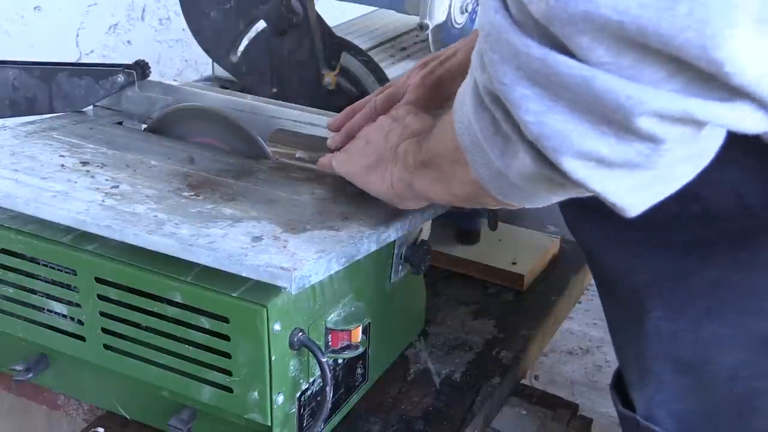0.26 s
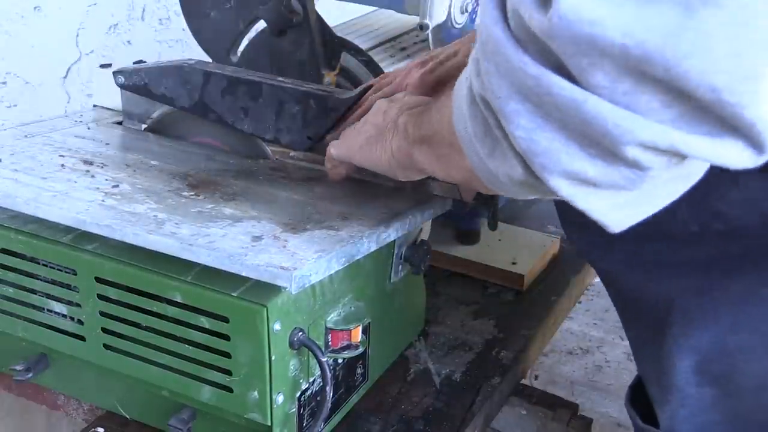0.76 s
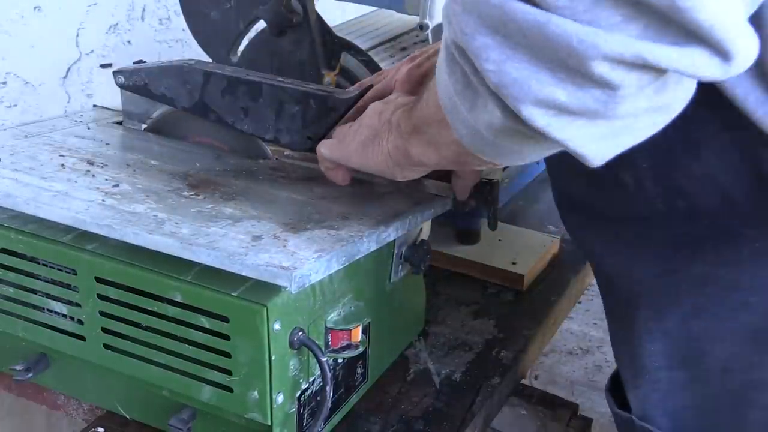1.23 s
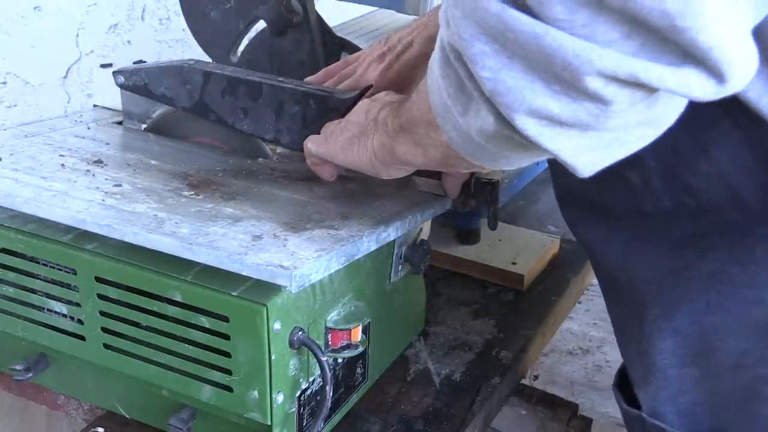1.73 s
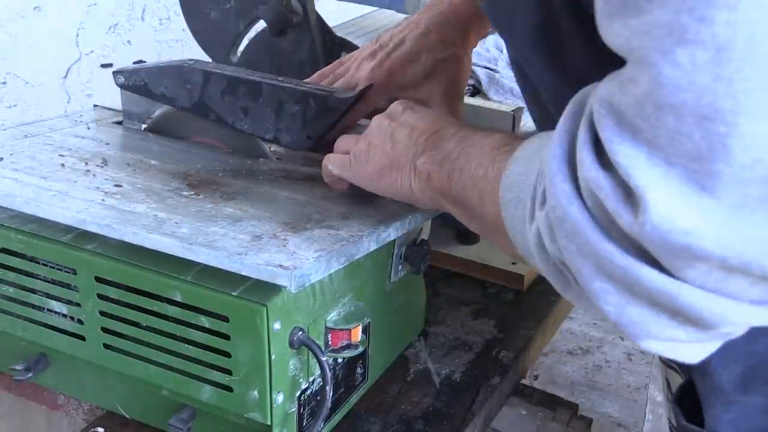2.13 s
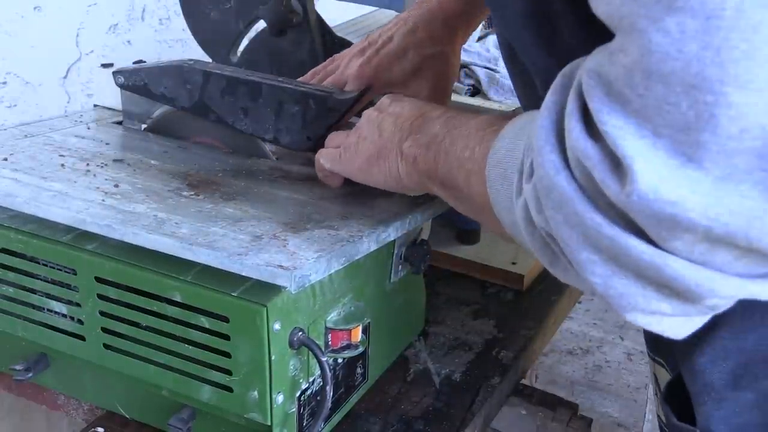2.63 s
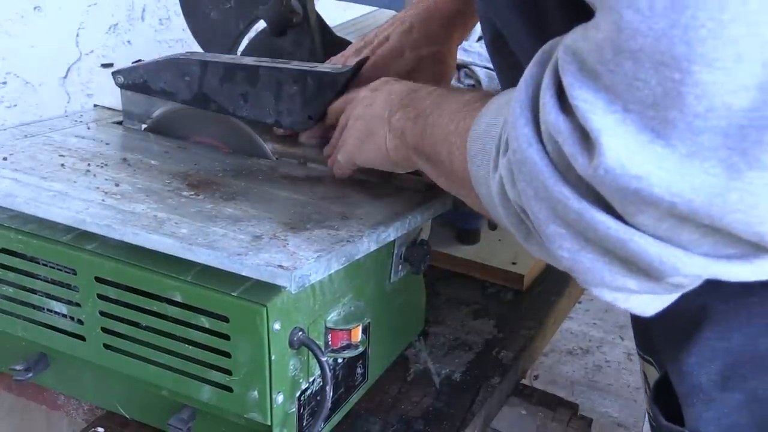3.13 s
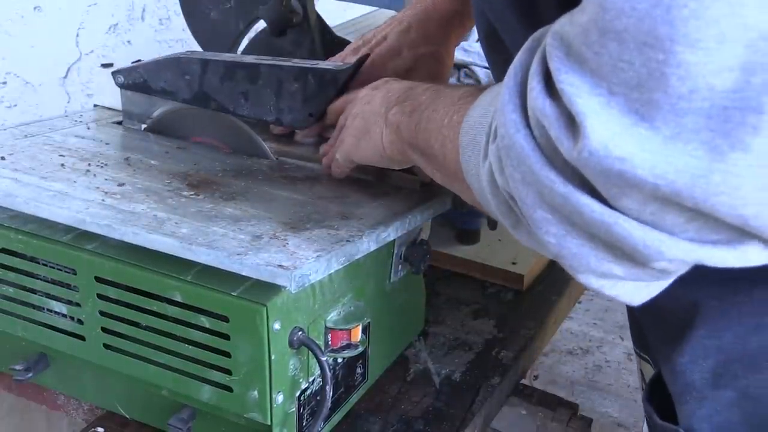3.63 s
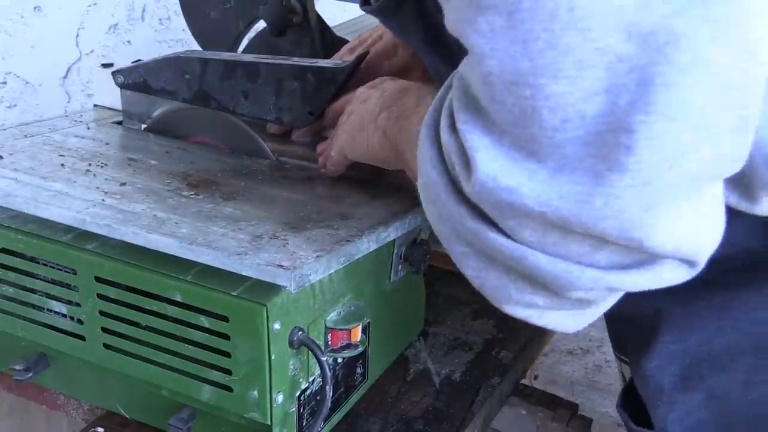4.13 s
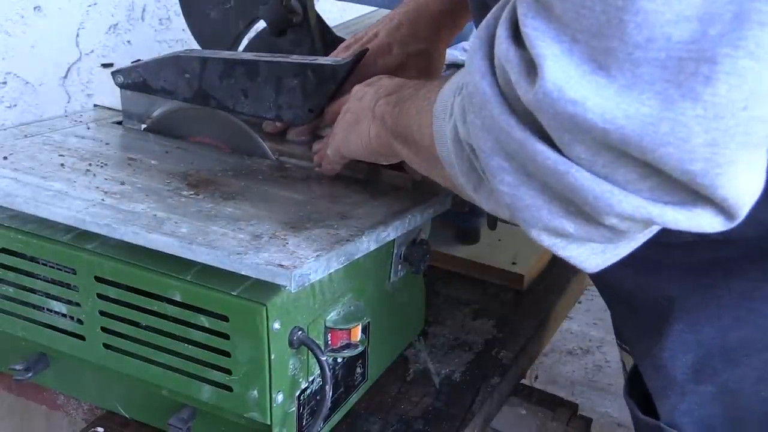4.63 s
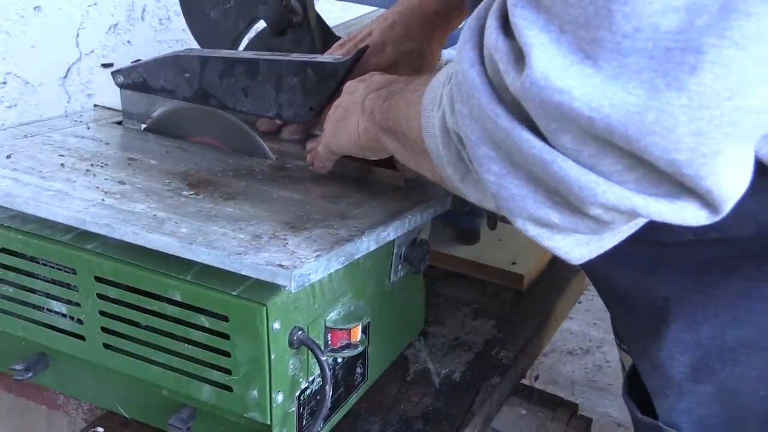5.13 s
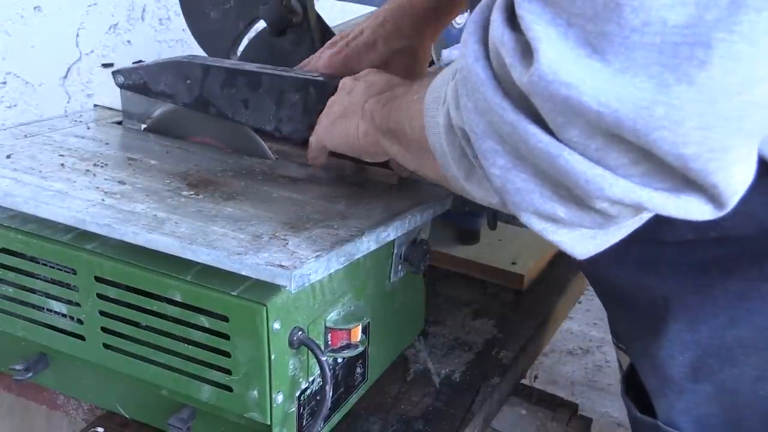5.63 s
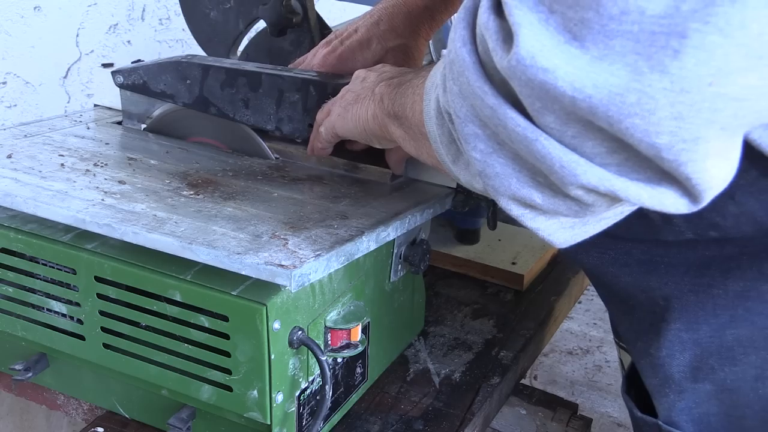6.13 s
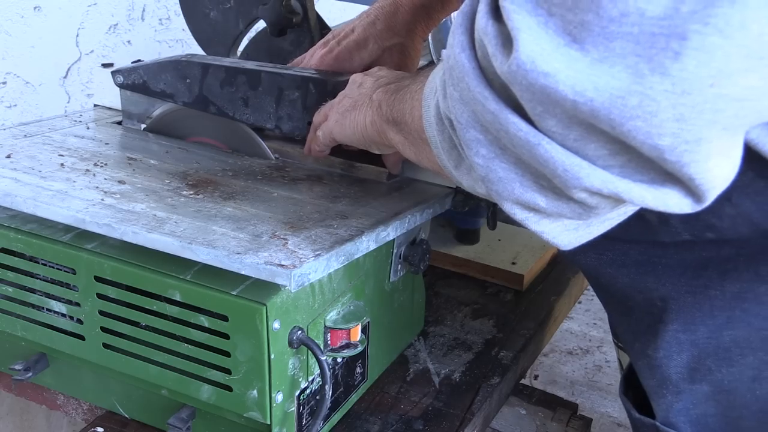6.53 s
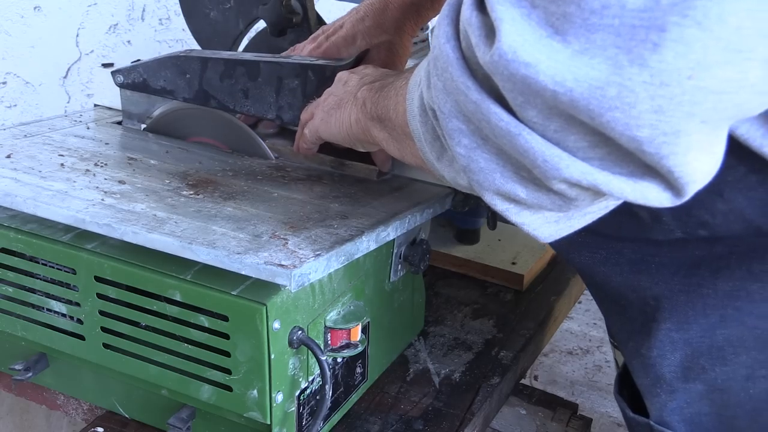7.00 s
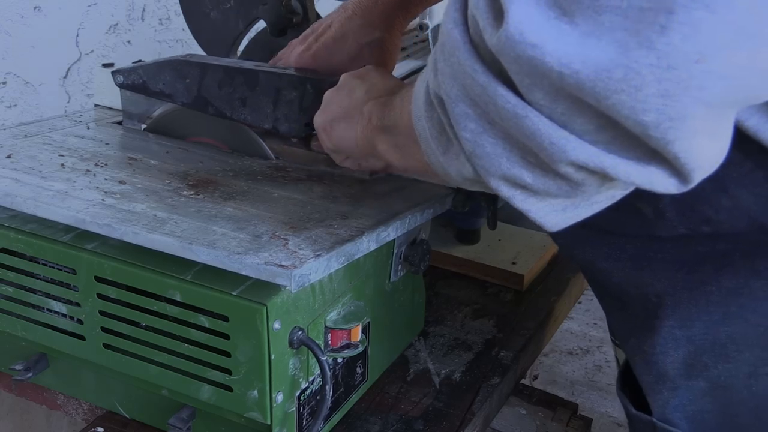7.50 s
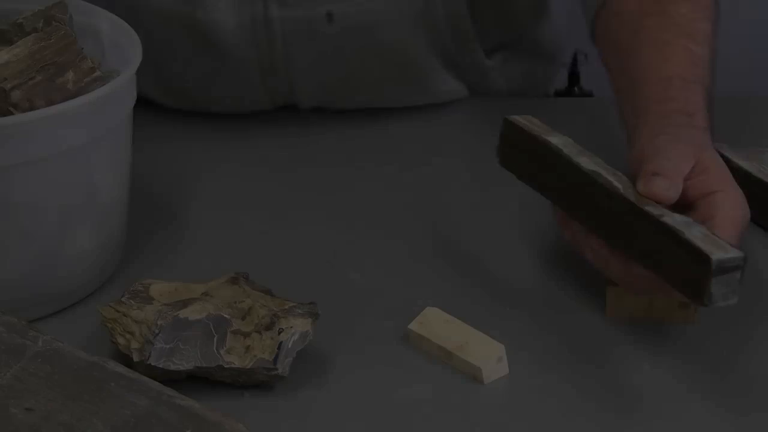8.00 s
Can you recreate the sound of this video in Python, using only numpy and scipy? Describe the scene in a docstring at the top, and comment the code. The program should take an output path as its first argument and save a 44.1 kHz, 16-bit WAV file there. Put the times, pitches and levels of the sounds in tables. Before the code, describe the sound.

From 0 seconds a small wet tile saw is already cutting stone, close and centred, with a shrill, many-toned metallic whine over a dense gritty hiss and bright water fizz. First contact rings clear and squealy; around 0.6 seconds a flake breaks with a tiny bright snap, nearly buried. Between about 0.7 and 2.6 seconds repeated pushes make the pitch sag slightly and the timbre shift, with brief squeals, strongest near 2.3 and 2.6. From 2.7 to 5 seconds the blade sits deep and the whine is steadier, with a slight tremble. Smaller dips return from 5 to 7.5 seconds, and high ringing grows brighter toward the end. At about 7.9 seconds the saw noise is cut instantly. Only a very faint, low room rumble remains, with a soft bump just after the cut and another near 8.1 seconds.

```python
"""In a workshop, a small wet tile saw grinds through a slab of stone, heard from a fixed spot beside it.
The blade rubs the stone about 353 times a second. This makes a stack of sine overtones that sags under load
and swells near the rings of the steel disc. Filtered noise makes the grit's hiss, the water's fizz and a
breaking flake. The saw stops at once, leaving a quiet room of low filtered noise with a few soft bumps."""
import sys
import numpy as np
from scipy import signal
from scipy.fft import rfft, irfft
from scipy.io import wavfile

SR = 44100
rng = np.random.default_rng(int(sys.argv[2]) if len(sys.argv) > 2 else 0)


def int16_out(signal):
    """Quantize to a 16-bit WAV file."""
    q = np.round(np.clip(np.atleast_2d(signal).T, -1, 1) * 32767)
    wavfile.write(sys.argv[1], SR, q.astype(np.int16))


N = 364266
TIME = np.arange(N) / SR  # s
FREQ = np.maximum(np.arange(N // 2 + 1) * SR / N, 1)  # Hz, kept above 0 for the logarithm
FREE_HZ = 352.1  # below this rubbing rate the blade starts to bind


def undb(db):
    """Turn decibels into a gain."""
    return np.exp(np.asarray(db) * (np.log(10) / 20))


def level(x, db):
    """Scale a sound to an rms level in dB."""
    return x * undb(db) / np.sqrt(np.mean(x ** 2))


def curves(table):
    """Join the points of a timed table with straight lines: one curve per column."""
    s, *columns = np.transpose(table)
    return [np.interp(TIME, s, column) for column in columns]


def swing(db):
    """Shift a level curve so that its mean power is 0 dB."""
    return db - 10 * np.log10(np.mean(undb(db) ** 2))


def walk(rate):
    """Wander by chance: straight lines between random values, `rate` of them a second, spread near 1."""
    s = np.arange(0, N / SR + 1, 1 / rate)
    shift = rng.random() / rate
    return np.interp(TIME, s - shift, rng.standard_normal(len(s)))


def hold(start, end, ramp):
    """Rise, hold and fall between 0 and 1; start and end are halfway up and down the ramps."""
    return np.clip(.5 + np.minimum(TIME - start, end - TIME) / ramp, 0, 1)


def colour(x, points):
    """Filter a sound by a spectrum of (Hz, dB) points."""
    hz, db = np.transpose(points)
    gain = undb(np.interp(np.log(FREQ), np.log(hz), db))
    return irfft(rfft(x) * gain, N)


def resonate(x, hz, width):
    """Pass a sound through one damped resonance, with gain 1 at its centre."""
    b, a = signal.iirpeak(hz, hz / width, fs=SR)
    return signal.lfilter(b, a, x + 1e-18)  # the tiny offset keeps silence from being exactly zero


def bursts(table):
    """Make short knocks: each a dying puff of noise sent twice through one broad resonance."""
    out = np.zeros(N)
    for s, db, hz, width, decay in table:
        fade = (TIME >= s) * np.exp(-np.abs(TIME - s) / decay)
        puff = fade * rng.standard_normal(N)
        knock = resonate(resonate(puff, hz, width), hz, width)
        # the fade's own rms makes the table's level that of the knock before it dies away
        out += level(knock, db) * np.sqrt(np.mean(fade ** 2))
    return out


# harder pushes on the stone, each slowing the blade for a moment:
# (middle t/s, length at half the sag t/s, sag f/Hz)
PUSHES = [(0.692, 0.059, 2.5), (.79, 0.076, 2.3), (1.137, .16, 1.0), (1.403, .05, 1.3), (1.604, .14, 3.7),
          (1.81, .08, 3.6), (1.973, .08, 3.7), (2.205, .1, 1.52), (2.326, .135, 6.0), (2.572, 0.091, 4.55),
          (5.032, 0.077, 1.43), (5.239, .18, 2.48), (5.598, 0.079, 1.3), (5.8, 0.072, 1.34),
          (5.999, 0.17, 1.76), (6.71, 0.078, 3.2), (7.102, .14, 1.53), (7.45, .12, 1.29)]


def sag():
    """How far the pushes slow the rubbing, in Hz: each builds, holds briefly and eases."""
    return sum(hz * .5 ** (np.abs(2 * (TIME - s) / length) ** 3) for s, length, hz in PUSHES)


# the steady feed of the stone: (t/s, rubbing rate f/Hz)
FEED = [(0, 352.7), (.32, 352.5), (.39, 354), (1.2, 353.4), (3.3, 353.5), (4.17, 355), (4.7, 354),
        (6.0, 353.9), (6.35, 354.7), (7.89, 354.4)]
TREMBLE_HZ, TREMBLE_PER_S = 0.4504, 16  # size, and changes a second


def rubbing_rate(sag_hz):
    """Rubs a second: the feed sets the rate, pushes lower it and uneven stone makes it tremble."""
    feed_hz, = curves(FEED)
    return feed_hz - sag_hz + TREMBLE_HZ * walk(TREMBLE_PER_S)


# how hard the rim grinds, before centring on its mean power: (t/s, level/dB)
GRIND = [(0, -1), (.4, -0.3), (.8, 0.9), (1.4, 0.3), (2.4, 0.5), (3.3, 0.55), (4.5, 1.25), (6.0, 1.3),
         (7.1, 1), (7.45, 1.5), (7.62, -0.9), (7.87, 0)]
GRIND_DB_PER_HZ = 0.23  # a push grinds louder, per Hz of sag


def grinding_force(sag_hz):
    """Grinding strength in dB: it follows the feed and rises as pushes slow the blade."""
    feed_db, = curves(GRIND)
    return swing(feed_db + GRIND_DB_PER_HZ * sag_hz)


# rings of the steel disc: (f/Hz, reach over nearby overtones f/Hz, width under grit f/Hz, grit level/dB)
RINGS = [(2164, 510, 97, -81), (2870, 274, 890, -72.5), (3884, 460, 400, -65), (5975, 190, 200, -64),
         (7030, 400, 120, -60.5), (9520, 650, 690, -63), (11890, 280, 170, -59)]
# how each ring answers the load, in the order of RINGS:
# (gain deep in the stone level/dB, change per Hz of sag level/dB)
RING_LOAD = [(-5, 0.14), (-5, 1.3), (-0.5, -0.74), (2.5, -0.4), (-0.9, 0.1), (-1.7, -0.93), (3, .5)]
# the blade sinks from the edge into the body of the stone: (t/s, depth/0-1)
DEPTH = [(2.1, 0.01), (2.7, 1)]
# the kerf (the cut slot) catches the disc and one ring takes hold, or is choked (negative lift):
# (start t/s, end t/s, ring f/Hz, lift level/dB, rise and fall t/s)
SWELLS = [(-.2, .8, 2164, 4, 0.17), (1.33, 1.56, 2164, 4.5, .1), (2.5, 2.636, 2164, 3.5, .08),
          (3.5, 4.4, 2164, 1.5, .15), (7.5, 8.1, 2164, 3, .2), (-.2, 0.377, 2870, 3.5, .06),
          (2.497, 4.1, 2870, 4.5, 0.17), (4.502, 6.4, 2870, 5, .2), (0.76, 1.842, 3884, 4.5, 0.13),
          (2.103, 2.68, 3884, -3, 0.084), (2.5, 5.953, 3884, 3.5, 0.091), (5.996, 8.1, 3884, 3, 0.27),
          (6.5, 8.1, 3884, 2.5, 0.23), (7.5, 8.1, 3884, 5, 0.11), (-.2, .63, 5975, 3.5, .1),
          (1.87, 1.933, 5975, 7, .04), (1.7, 2.7, 5975, 3.5, 0.15), (6.61, 8.1, 5975, 4.5, 0.26),
          (7.55, 7.66, 5975, 3, 0.046), (-.2, 1.12, 7030, 7.5, .15), (-.2, .41, 7030, 4, .06),
          (0.59, .98, 7030, 5, .06), (1.178, 2.142, 7030, 12.5, .1), (4.15, 8.105, 7030, 8, .2),
          (5, 5.4, 7030, 4.5, 0.095), (5.87, 6.11, 7030, 4, 0.054), (6.61, 8.103, 7030, 4.5, .15),
          (7.39, 8.1, 7030, 4.5, 0.13), (-.2, .07, 9520, 4.5, .06), (-.2, .68, 9520, 5, .15),
          (1.44, 1.53, 9520, 6, .06), (1.72, 2.05, 9520, 3, .08), (2.7, 3.25, 9520, 3, .1),
          (0.46, .55, 11890, 13.5, .06), (2.26, 2.66, 11890, 2, .08), (4.24, 7.15, 11890, 3.2, .4),
          (6.54, 6.8, 11890, 3.5, .1)]
WANDER_DB, WANDER_PER_S = 1.15, 14  # the rings trade strength by chance
SETTLED = 0.59  # share of that wander left deep in the stone


def ring_levels(sag_hz):
    """Each ring's swing in dB: it follows depth and load, wanders, and swells when the kerf catches it."""
    depth, = curves(DEPTH)
    wander_db = WANDER_DB * (1 + depth * (SETTLED - 1))
    rings = []
    for deep_db, db_per_hz in RING_LOAD:
        load_db = deep_db * depth + db_per_hz * sag_hz
        rings.append(load_db + wander_db * walk(WANDER_PER_S))
    for start, end, hz, lift_db, ramp in SWELLS:
        nearest = np.argmin([abs(ring[0] - hz) for ring in RINGS])
        rings[nearest] += lift_db * hold(start, end, ramp)
    return np.array([swing(db) for db in rings])


# the stone pinches the rim and the overtone nearest f squeals: (start t/s, end t/s, f/Hz, lift level/dB)
SQUEALS = [(-.2, .38, 2470, 2), (-.2, .38, 2830, 1.5), (-.2, .38, 3530, 8), (0.403, 0.694, 2470, 4.5),
           (1.542, 1.682, 3180, 1.5), (1.197, 2.14, 7060, 3), (1.95, 2.032, 3180, 5.5),
           (2.14, 2.394, 3180, 5), (2.1, 2.384, 2830, 7.5), (2.259, 2.379, 2470, 6), (2.53, 2.631, 3180, 6),
           (2.531, 3.15, 2470, 9.5), (2.53, 4.122, 2830, 2), (5.184, 5.31, 3180, 5),
           (5.301, 5.847, 2830, 2), (5.9, 6.09, 7060, 2.5), (6.1, 7.95, 3180, 4.5), (7.2, 7.951, 8120, 8)]
SQUEAL_RAMP_S = 0.013


def squeal_db(k):
    """Lift in dB of the k-th overtone while the pinched rim squeals."""
    return sum(db * hold(start, end, SQUEAL_RAMP_S)
               for start, end, hz, db in SQUEALS if round(hz / FREE_HZ) == k)


# the whine's overtones, one row for each multiple of the rubbing rate from the 3rd up:
# (as the blade enters level/dB, deep in the stone level/dB, extra while it binds level/dB)
OVERTONES = [(-85.5, -88, 0), (-95, -83.5, 3), (-77.5, -82, 5.5), (-62.5, -61, 1), (-67.5, -74, 4),
             (-66, -62.5, -3), (-65.5, -67.5, 7), (-71, -67.5, 2), (-57, -61, 4.5), (-72.5, -62.5, 6.5),
             (-76.5, -82, 0), (-68.5, -75, 3.5), (-67.5, -70.5, 0), (-82, -68, 12.5), (-61.5, -60, -1),
             (-63, -63, 4), (-64.5, -64, 0), (-57, -58.5, -5), (-82, -73, 1), (-71, -70.5, 1),
             (-66.5, -72, 0), (-72.5, -68, 5), (-61, -73, 6), (-61.5, -62, -14), (-60, -59, 3),
             (-63, -60.5, -6), (-71, -69, 2), (-71, -72, -2), (-73.5, -74.5, -1), (-74, -77, -10.0),
             (-81, -77, -5), (-69, -66, 6), (-63, -67, -4), (-82.5, -74.2, 2), (-77, -72.5, -7),
             (-82, -75.5, 9), (-78, -78.5, -4), (-80, -82.5, 5), (-68, -84, -3), (-71, -74, 1),
             (-61.5, -71, -3), (-65.5, -69, 1)]
# the rim rubs cleanest on first contact and near the end, lifting overtones between the rings:
# (t/s, level/dB)
RUB = [(0, 7), (.35, 1), (.42, -1.5), (1.2, -4.5), (1.6, -1), (2.6, -2), (3.6, 1), (7.1, 0.5), (7.6, 1.5)]
BIND_SAG_HZ = 2.8  # this far below the free rate the blade binds hard


def whine(rubs, speed_hz, grind_db, ring_swings, flicker_db=1.26, waver=0.12, drift=0.44, bite=0.92):
    """Overtones locked to the rubbing; each swells with the rings of the disc that lie near it."""
    out = np.zeros(N)
    depth, = curves(DEPTH)
    rub_db, = curves(RUB)
    binding = np.clip((FREE_HZ - speed_hz) / BIND_SAG_HZ, 0, 1)
    pressure_db = bite * grind_db + rub_db
    for k, (entry_db, deep_db, bind_db) in enumerate(OVERTONES, 3):
        near = np.array([1 / (1 + ((k * FREE_HZ - hz) / reach) ** 4) for hz, reach, _, _ in RINGS])
        near /= max(near.sum(), 1)
        # the balance changes as the kerf closes round the disc
        db = entry_db + depth * (deep_db - entry_db)
        db += binding * bind_db + squeal_db(k)
        # overtones far from any ring just follow the pressure on the stone
        db += near @ ring_swings + (1 - near.sum()) * pressure_db
        # the shifting contact makes strength and phase flutter; high overtones vary most in strength
        db += flicker_db * (1 + k / 30) * walk(20)
        phase = 2 * np.pi * (k * rubs + rng.random())
        phase += waver * walk(50) + drift * walk(1)  # radians
        out += np.sqrt(2) * undb(db) * np.sin(phase)
    return out


def grains(rubs, spread_db=2.5, pulsing=0.16, recut=0.11):
    """Countless tiny fractures of uneven size, thicker once in every rub."""
    size = undb(spread_db * np.repeat(rng.standard_normal(N // 6 + 1), 6)[:N])  # new every 6 samples
    pulse = 1 + pulsing * np.cos(2 * np.pi * rubs)
    cracks = rng.standard_normal(N) * size * pulse
    # each rub meets the roughness left by the one before, which gathers the hiss round the overtones
    return cracks + recut * np.interp(rubs - 1, rubs, cracks)


# tone of the stone grit, before the hiss is set to its level: (f/Hz, level per Hz/dB)
GRIT = [(30, -29.5), (100, -24), (300, -27), (480, -24), (700, -17), (1000, -12), (1600, -8), (2500, -2.5),
        (4700, -2.5), (6500, 2.5), (7800, -1.5), (10500, 1.5), (13500, -5.5), (15300, 2)]


def grinding(rubs, grind_db, ring_swings, hiss_db=-49.5, sputter_db=1.2, follow=0.61):
    """Diamonds crush wet stone: a broad hiss, and rough ringing where the grit strikes the disc."""
    hiss = level(colour(grains(rubs), GRIT), hiss_db)
    out = hiss * undb(grind_db + sputter_db * walk(70))
    # the thin disc radiates little bass
    no_bass = signal.butter(2, 1500, "high", fs=SR, output="sos")
    strikes = signal.sosfilt(no_bass, grains(rubs))
    for (hz, _, width, db), ring_db in zip(RINGS, ring_swings):
        ringing = resonate(strikes, hz, width) * undb(follow * ring_db)
        out += level(ringing, db)
    return out


def spray(drop_db=7.5, centre_hz=14500, width_hz=4500, db=-62):
    """Water flung off the rim patters as a fine, bright fizz: noise of fast-changing strength."""
    drops = rng.standard_normal(N) * undb(drop_db * np.clip(walk(1500), -3, 2))
    fizz = resonate(resonate(drops, centre_hz, width_hz), centre_hz, width_hz)
    return level(fizz, db)


# a flake breaks off the edge: (t/s, starting level/dB, centre f/Hz, width f/Hz, decay t/s)
CHIPS = [(.566, -45.5, 5000, 5500, 0.0077)]


def chips():
    """A breaking flake gives one short, bright knock of resonant noise."""
    return bursts(CHIPS)


# tone and strength of the quiet room, before ROOM_DB sets the overall level: (f/Hz, level per Hz/dB)
ROOM = [(8.8, -31.5), (15, -8), (27, -3.5), (144, -15), (319, -11), (435, -19.5), (647, -17), (789, -19),
        (962, -23.5), (2250, -26), (8750, -33.5), (12500, -36), (13500, -62)]
ROOM_DB = -71.5
# soft handling bumps in the quiet: (t/s, starting level/dB, centre f/Hz, width f/Hz, decay t/s)
BUMPS = [(7.955, -75, 326, 440, 0.03), (8.112, -68, 420, 706, 0.013), (8.142, -84, 3000, 6000, .018)]


def quiet_room(side_db=-20):
    """A low rumble of still air, slightly different left and right, with a few soft bumps."""
    mid, side = (level(colour(rng.standard_normal(N), ROOM), ROOM_DB) for _ in range(2))
    left_right = np.array([[1], [-1]])
    return mid + bursts(BUMPS) + undb(side_db) * side * left_right


STOP_S, ROOM_S = 7.8945, 7.905  # the saw stops; the room starts after a tiny silent gap


def scene():
    """The saw, dead centre, until the sound switches to the quiet room."""
    sag_hz = sag()
    speed_hz = rubbing_rate(sag_hz)
    rubs = np.cumsum(speed_hz) / SR  # running count of rubs
    grind_db = grinding_force(sag_hz)
    ring_swings = ring_levels(sag_hz)
    saw = whine(rubs, speed_hz, grind_db, ring_swings)
    saw += grinding(rubs, grind_db, ring_swings)
    saw += spray() * undb(grind_db) + chips()
    return saw * (TIME < STOP_S) + quiet_room() * (TIME > ROOM_S)


TOP_HZ = 15750


def record(dry):
    """Cut the treble above TOP_HZ steeply with a low-pass filter."""
    low_pass = signal.ellip(12, .1, 80, TOP_HZ, fs=SR, output="sos")
    return signal.sosfilt(low_pass, dry)


dry = scene()
out = record(dry)
int16_out(out)
```